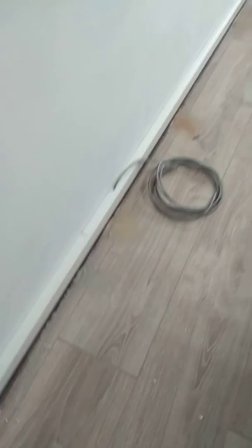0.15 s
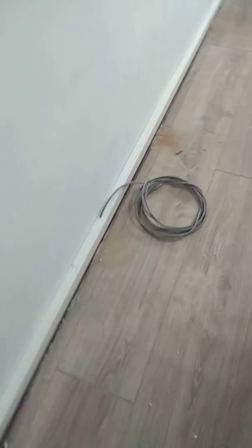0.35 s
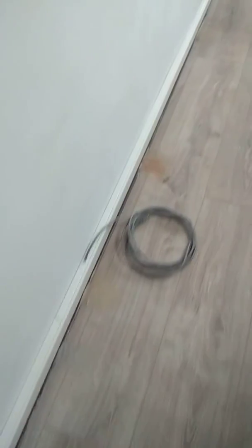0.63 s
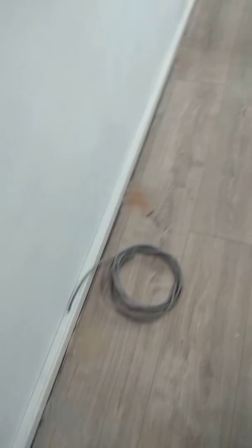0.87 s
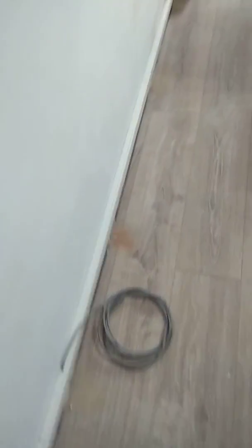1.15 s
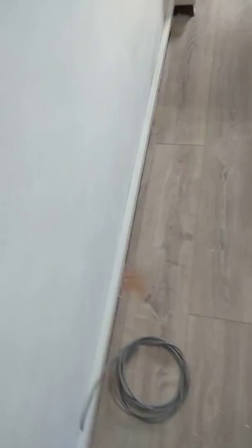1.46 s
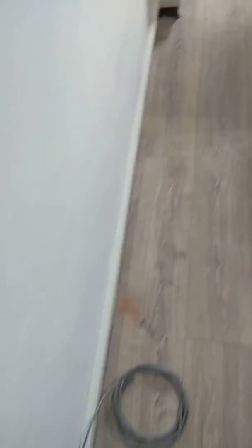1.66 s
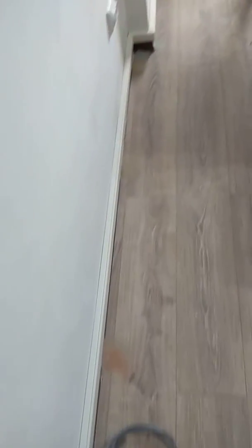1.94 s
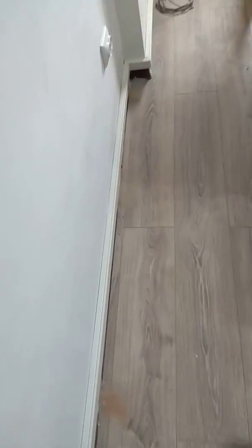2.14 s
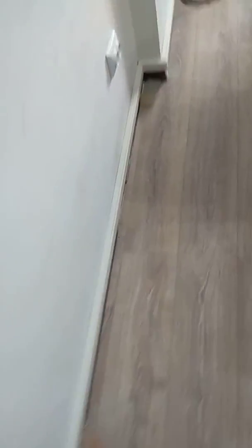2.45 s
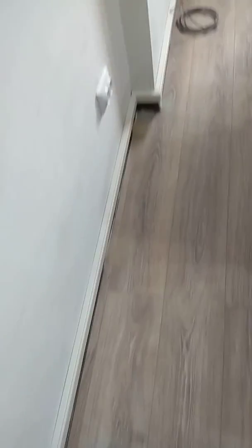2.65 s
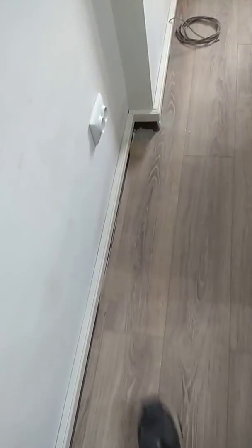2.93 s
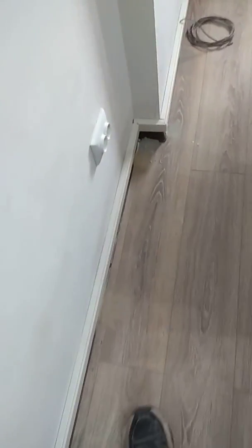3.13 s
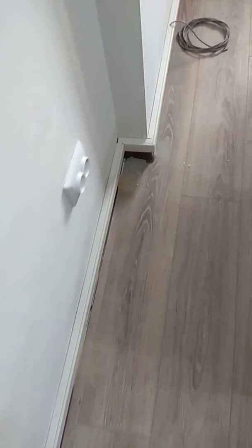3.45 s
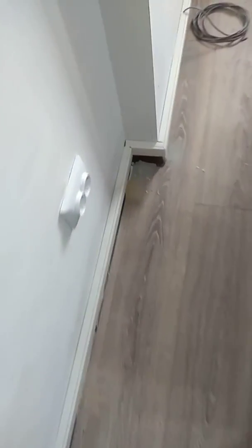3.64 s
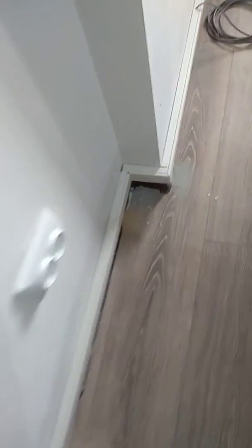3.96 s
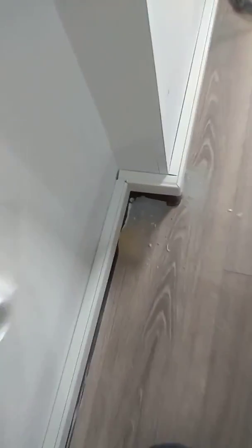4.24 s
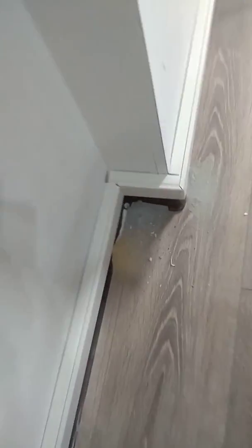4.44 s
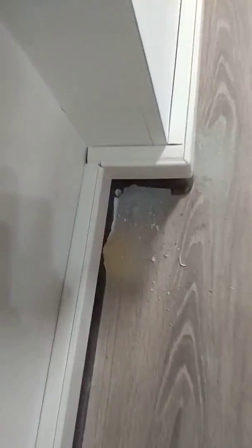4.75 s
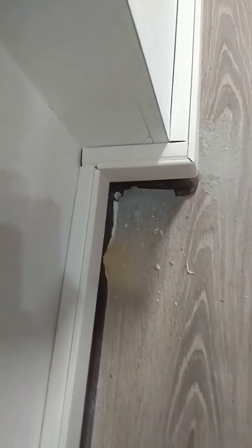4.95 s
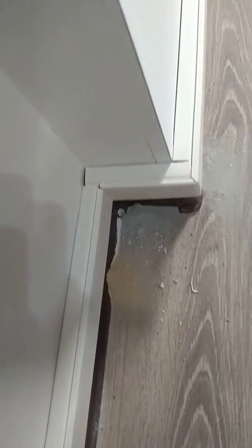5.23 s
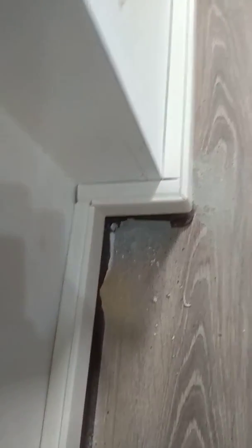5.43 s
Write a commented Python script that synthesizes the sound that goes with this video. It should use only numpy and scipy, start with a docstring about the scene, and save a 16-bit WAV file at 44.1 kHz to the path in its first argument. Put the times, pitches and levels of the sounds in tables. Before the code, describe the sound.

Slow, uneven footsteps on hollow laminate: knocks at the start, then a step about every second, ending with a tight cluster of scuff and thuds. Rubber soles rub and skid over fine grit, thin bright cracks snap from the boards, and trouser fabric hisses softly. Short bare-room reflections surround the steps, over a faint steady low rumble. Heard in stereo from a phone carried in the walker's hand, bright and close, without speech.

```python
"""Slow steps on laminate

Trainers cross a floating laminate floor in a bare office, heard from a phone with two ports in the walker's hand.
Each heel knocks the boards: a push sets plank modes sounding, and a boom and rings build up behind it.
The sole scuffs and rolls over fine grit: noise and random grains, filtered and swelling with the steps.
Plank joints tick as short ringing cracks; trouser cloth swishes as filtered hiss, over a low room rumble.
"""
import sys
import numpy as np
from scipy import signal
from scipy.fft import rfft, irfft, next_fast_len
from scipy.io import wavfile
from scipy.ndimage import uniform_filter1d

SR = 44100
rng = np.random.default_rng(int(sys.argv[2]) if len(sys.argv) > 2 else 0)


def wav_out(sig):
    """Save sig, one row per channel (or a flat mono array), as 16-bit PCM at SR to the path in sys.argv[1]."""
    wavfile.write(sys.argv[1], SR, np.round(np.clip(np.atleast_2d(sig).T, -1, 1) * 32767).astype(np.int16))


N = 246632
TOP_HZ = 16000
PORT_LAG_S = 0.000281


def undb(db):
    """Decibels to gain."""
    return 10 ** (np.asarray(db) / 20)


def unit(x):
    """Scale to rms 1."""
    return x / np.sqrt(np.mean(x ** 2))


def seconds(length):
    """Time axis of the given length."""
    return np.arange(int(length * SR)) / SR


def fade(t, t60):
    """Exponential decay, 60 dB down at t60."""
    return np.exp(-np.log(1000) * t / t60)


def add(out, x, s):
    """Mix x into out from time s on."""
    i = max(int(s * SR), 0)
    out[..., i:i + x.shape[-1]] += x[..., :max(N - i, 0)]


def colour(x, points, tilt_db=0):
    """Filter by (Hz, dB) points plus a tilt per octave that is zero at the last point."""
    hz, db = np.transpose(points)
    size = next_fast_len(x.shape[-1] + 512)
    octave = np.log2(np.maximum(np.fft.rfftfreq(size, 1 / SR), hz[0]))
    gain_db = np.interp(octave, np.log2(hz), db) + tilt_db * (octave - np.log2(hz[-1]))
    return irfft(rfft(x, size) * undb(gain_db), size)[..., :x.shape[-1]]


def walk(rate, size):
    """Smooth random wander with a spread near 1."""
    hold = int(SR / rate)
    steps = np.repeat(rng.standard_normal(size // hold + 2), hold)
    return 1.2 * uniform_filter1d(steps, hold)[:size]


def modes(t, table, base_hz=1):
    """Sum of fading sines from (Hz or multiple of base_hz, dB, t60) rows."""
    return sum(undb(db) * np.sin(2 * np.pi * base_hz * k * t) * fade(t, t60) for k, db, t60 in table)


def from_below(x):
    """Sound from the floor reaches the left port first."""
    sample = np.arange(len(x))
    late = np.interp(sample - PORT_LAG_S * SR, sample, x, left=0)
    return np.array([x, late])


def diffuse(size, alike_hz=1000):
    """Noise from all sides: nearly the same at both ports in the bass, unrelated in the treble."""
    padded = 2 * next_fast_len(size // 2 + 1)
    mid, side = rfft(rng.standard_normal((2, padded)))
    alike = np.clip(0.91 * np.sinc(np.linspace(0, SR / 2, len(mid)) / alike_hz), -1, 1)
    mid, side = mid * np.sqrt(1 + alike), side * np.sqrt(1 - alike)
    return unit(irfft(np.array([mid + side, mid - side]))[:, :size])


def room(x, t60, gap_s, early_db, early_t60):
    """Echoes of the near wall, then the tail of the bare room; drawn anew for every sound."""
    t = seconds(.7)
    decay = fade(t, t60) + undb(early_db) * fade(t, early_t60)
    echoes = diffuse(len(t)) * decay * (t > gap_s)
    return signal.fftconvolve(x[None], echoes / np.sqrt(np.sum(echoes ** 2) / 2), axes=1)


def friction(size, grain_db, flicker_db):
    """Dense tiny slips: a diffuse hiss with grains of uneven size, coming in fits."""
    sizes = undb(4 * np.minimum(rng.exponential(size=size), 3.5))
    struck = rng.random(size) < 1500 / SR  # about 1500 grains per second
    grains = unit(sizes * rng.choice([-1, 1], size) * struck)
    hiss = diffuse(size) + undb(grain_db) * from_below(grains)
    return hiss * undb(flicker_db * walk(110, size))


def ripple(x, ring_db, ring_t60=0.05):
    """Ripple the spectrum above about 1 kHz with a short, randomly drawn ring."""
    t = seconds(.03)
    direct = (t == 0).astype(float)
    ring = rng.standard_normal(len(t)) * fade(t, ring_t60)
    response = direct + undb(ring_db) * ring / np.sqrt(np.sum(ring ** 2))
    response /= np.sqrt(np.sum(response ** 2))
    # mainly the treble departs from the direct sound
    treble = signal.butter(1, 1200, "high", fs=SR, output="sos")
    response = direct + signal.sosfilt(treble, response - direct)
    return signal.fftconvolve(x, response[None], axes=1)[:, :x.shape[1]]


# spectrum of cracking dust: (frequency_hz, density_db)
GRIT_COLOUR = [(500, -16), (1800, -12), (3200, -1), (4300, -40), (5800, -1), (8000, -3.5), (11000, 13),
               (16000, 10.5)]


def grit(size, per_s):
    """Lone grains of dust crack: randomly timed noise bursts of uneven size, fading within milliseconds."""
    sizes = undb(5 * np.minimum(rng.exponential(size=size), 2))
    cracks = sizes * (rng.random(size) < per_s / SR)
    envelope = signal.fftconvolve(cracks, fade(seconds(.008), 0.006))[:size]
    bursts = envelope * rng.standard_normal(size)
    return from_below(unit(colour(bursts, GRIT_COLOUR)))


# spectrum of the office rumble: (frequency_hz, density_db)
RUMBLE_COLOUR = [(20, -49), (50, -21), (85, -20.5), (120, -1.5), (160, 4), (240, 0), (400, -10),
                 (650, -15.5), (1050, -16.5), (1500, -32), (4000, -92), (16000, -26)]
# faint low hums in the room: (start_s, end_s, centre_pitch_hz, level_db)
HUMS = [(1.758, 1.96, 214, -55), (3.0, 3.82, 168.8, -58.5), (3.892, 4.204, 104.8, -66)]


def building(rumble_db=-59.5, wander_db=0.84):
    """Low room rumble, wandering slightly in level, in which unsteady faint hums swell and fade."""
    level_db = rumble_db + wander_db * walk(7.4, N)
    out = undb(level_db) * unit(colour(diffuse(N), RUMBLE_COLOUR))
    for start, end, hz, db in HUMS:
        size = int((end - start) * SR)
        phase = 2 * np.pi * np.cumsum(hz * (1 + 0.041 * walk(9.2, size))) / SR
        hum = np.sqrt(2) * np.sin(phase) * signal.windows.tukey(size, .6)
        add(out, undb(db) * hum, start)
    return out


# the sole rolls under the weight and the trouser leg settles; rub is before rustle's overall trim:
# (full_load_s, rub_level_db, swish_level_db, release_t60_s)
ROLLS = [(0.0, -45.5, -47, 0.68), (0.55, -54.5, -48.5, 1.07), (1.492, -52.5, -48.5, 0.91),
         (1.74, -53.5, -57, 0.88), (2.335, -50, -60, 1), (3.15, -50.5, -54, 0.71),
         (3.823, -50, -45.5, 0.92), (4.35, -53, -47.5, 0.72)]
# a leg swings through; rub is before the same trim: (mid_swing_s, rub_level_db, swish_level_db, half_length_s)
SWINGS = [(0.28, -63.5, -59.5, 0.1), (1.08, -62, -61, 0.12), (2.164, -59, -56.5, 0.11),
          (3.568, -60, -61, 0.072), (4.23, -51.5, -50.5, 0.19), (4.688, -62, -52.5, 0.16),
          (5.476, -87, -66.5, 0.17)]


def effort(rise_t60_s=0.82, hold_s=0.026, stir_rub_db=-76.5, stir_swish_db=-62.5, stop_s=5.042, stop_t60_s=0.63):
    """Gains of rub and swish: rolls build, hold and release, swings swell and ebb, over a faint stir."""
    t = np.arange(N) / SR
    walking = fade(np.maximum(t - stop_s, 0), stop_t60_s)
    power = (undb([[stir_rub_db], [stir_swish_db]]) * walking) ** 2
    for s, rub_db, swish_db, t60 in ROLLS:
        build = fade(np.maximum(s - t, 0), rise_t60_s)
        release = fade(np.maximum(t - s - hold_s, 0), t60)
        power += (undb([[rub_db], [swish_db]]) * build * release) ** 2
    for s, rub_db, swish_db, half_s in SWINGS:
        speed = np.exp(-.5 * ((t - s) / half_s) ** 2)
        power += (undb([[rub_db], [swish_db]]) * speed) ** 2
    return np.sqrt(power)


def changing_ripple(x, ring_db, stretch_s):
    """Overlapping stretches of the hiss, each with its own random spectral ripple, crossfade smoothly."""
    out, size = np.zeros((2, N)), int(stretch_s * SR)
    half = size // 2
    padded = np.pad(x, [(0, 0), (half, size)])
    for i in range(0, N + half, half):
        stretch = ripple(padded[:, i:i + size], ring_db) * signal.windows.cosine(size)
        # the first stretch starts halfway through
        add(out, stretch[:, max(half - i, 0):], (i - half) / SR)
    return out


# spectrum of passing trouser cloth: (frequency_hz, density_db)
SWISH_COLOUR = [(500, -19), (2000, -16), (5000, -13.5), (7500, -8.5), (10300, 2.5), (13000, 2), (16000, -3)]
# spectrum of the sole rubbing the boards: (frequency_hz, density_db)
RUB_COLOUR = [(120, 7), (350, 17), (800, 11), (1300, 12), (2200, 11), (3200, 11.5), (5500, 8), (8000, 4.5),
              (11000, 0), (16000, -28)]


def rustle(rub_db=-1, grit_db=-5, crackle_db=-10):
    """Trouser legs swish and faintly crackle as they pass; the loaded sole adds a coarser, gritty rub."""
    rub_level, swish_level = effort()
    cloth = changing_ripple(friction(N, grain_db=-19, flicker_db=1.6), ring_db=-5, stretch_s=.12)
    swish = unit(colour(cloth, SWISH_COLOUR)) + undb(crackle_db) * grit(N, per_s=35)
    sole = changing_ripple(friction(N, grain_db=-12, flicker_db=1.4), ring_db=7, stretch_s=.16)
    rub = unit(colour(sole, RUB_COLOUR)) + undb(grit_db) * grit(N, per_s=170)
    return swish_level * swish + undb(rub_db) * rub_level * rub


# larger grains bursting under the sole: (start_s, peak_level_db)
GRAINS = [(0.414, -25), (0.436, -36), (0.549, -27), (0.662, -26), (0.669, -27), (1.056, -34), (1.120, -34),
          (1.325, -31), (1.412, -24), (1.464, -30), (2.974, -22.5), (3.040, -27), (3.842, -24),
          (4.2195, -21), (5.347, -44), (5.499, -41)]


def crunches(shade_db=-4, room_db=-8):
    """Now and then a larger grain bursts under the sole with a tiny sharp crack, weaker at the right port."""
    out, t = np.zeros((2, N)), seconds(.02)
    for s, db in GRAINS:
        crack = colour(rng.choice([-1, 1], len(t)) * fade(t, 0.005), GRIT_COLOUR)
        crack *= undb(db) / np.abs(crack).max()
        echoes = room(crack, t60=0.7, gap_s=0.002, early_db=7, early_t60=0.2)
        add(out, from_below(crack) * undb([[0], [shade_db]]), s)
        add(out, undb(room_db) * echoes, s)
    return out


# spectrum of plank joint cracks: (frequency_hz, gain_db)
TICK_COLOUR = [(800, 6), (2200, 12.3), (4000, 0.5), (7000, 1.04), (11000, 6.2), (16000, 5)]
# plank joints ticking; the ring fades in half the crack's time:
# (start_s, level_db, ring_pitch_hz, ring_level_db, crack_t60_s, crack_low_hz, crack_high_hz, room_level_db)
TICKS = [(.0878, -28, 5640, -11, 0.008, 4800, 15000, -10),
         (0.4994, -22.5, 9100, -13, 0.0024, 6030, 14900, -0.5),
         (1.8573, -30, 3340, -1.5, 0.0045, 2900, 12800, -2.5),
         (2.076, -35.5, 5900, -5, 0.0039, 4400, 15100, -4),
         (2.262, -20.5, 5800, 0.5, 0.0083, 5400, 12000, -2.5),
         (2.262, -30, 3200, -11, 0.0069, 2420, 3650, -7), (2.486, -25, 8400, -4, 0.0034, 5660, 14900, -2.5),
         (3.0593, -24, 7600, -2.5, 0.0031, 5500, 15000, 3.5),
         (3.1358, -19.5, 4800, -26, 0.0031, 4570, 12800, 2),
         (3.6078, -30.5, 4700, 2.5, 0.0041, 3500, 13900, -6.5),
         (3.813, -32, 7100, -9, 0.0032, 5200, 15000, 6), (4.336, -28.5, 7600, -7, 0.0039, 5000, 15000, -14),
         (4.4416, -25, 9700, 0, 0.0026, 7000, 15500, -15),
         (4.499, -22, 7800, -14, 0.014, 6270, 12900, -12.5),
         (4.579, -35.5, 12100, 1, 0.006, 8500, 15500, -13),
         (4.7617, -31, 5500, -5.5, 0.0084, 5000, 13400, -11),
         (4.809, -30.5, 8450, -16, 0.006, 5730, 15000, -18.5),
         (5.5611, -36, 2650, -11.5, 0.015, 5860, 14100, -8.5)]


def ticks(crack_db=-3, shade_db=-5):
    """A joint slips under the weight: a crack that rings for a few milliseconds and wakes the room."""
    out, t = np.zeros((2, N)), seconds(.03)
    for s, db, hz, ring_db, t60, low_hz, high_hz, room_db in TICKS:
        snap = modes(t, [(hz, ring_db, t60 / 2)])
        crack = undb(crack_db) * rng.choice([-1, 1], len(t)) * fade(t, t60)
        band = signal.butter(3, [low_hz, high_hz], "band", fs=SR, output="sos")
        tick = undb(db) * (snap + colour(signal.sosfilt(band, crack), TICK_COLOUR))
        echoes = room(tick, t60=0.53, gap_s=0.00126, early_db=7, early_t60=0.32)
        add(out, from_below(tick) * undb([[0], [shade_db]]), s)
        add(out, undb(room_db) * echoes, s)
    return out


# spectrum of rubber skidding on laminate: (frequency_hz, density_db)
SCUFF_COLOUR = [(200, -30), (700, 10), (1500, 5.5), (2400, 0.5), (3400, 4), (4700, 4), (5900, 3.5),
                (7500, 1), (10000, 8.5), (13000, 4.5), (15000, -1), (16000, -29)]
# sole scuffs: (start_s, level_db, rise_s, release_t60_s, brightness_db_per_octave)
SCUFFS = [(0.015, -39, 0.024, 0.068, 14), (0.333, -35, 0.0012, 0.41, 3.5), (0.427, -44.5, 0.006, 0.23, 3.5),
          (0.499, -44, 0.002, 0.04, 6), (0.654, -53, 0.019, 0.25, -3.5), (1.118, -53.5, 0.0062, 0.3, 2.5),
          (1.322, -44, 0.002, 0.13, 5.5), (1.345, -45, 0.092, 0.64, -0.5), (1.41, -34, 0.00084, 0.055, 3.5),
          (1.429, -35.5, 0.0033, 0.069, 1.5), (1.558, -41, 0.018, 0.077, 9),
          (1.672, -32.5, 0.0018, 0.11, 9), (1.679, -37.5, 0.0016, 0.23, 4),
          (2.19, -41.5, 0.0048, 0.59, 1.5), (2.29, -41.5, 0.076, 0.33, 3), (2.484, -45, 0.0025, 0.22, 3.5),
          (2.97, -44, 0.0027, 0.46, 2.5), (3.081, -38, 0.004, 0.2, 6), (3.134, -44.5, 0.0013, 1, 2.5),
          (3.697, -35, 0.0073, 0.19, 9.5), (3.9, -40, 0.011, 0.12, 4), (4.218, -31.5, 0.006, 0.26, 3.5),
          (4.29, -49, 0.016, 0.31, 0.5), (4.346, -32.5, 0.0021, 0.045, 16)]


def scuffs():
    """The sole skids briefly as it lands or pushes off, catching unevenly and crunching dust."""
    out, t = np.zeros((2, N)), seconds(.4)
    for s, db, rise, t60, tilt_db in SCUFFS:
        skid = np.minimum(t / rise, 1) ** 0.2 * fade(np.maximum(t - rise, 0), t60)
        slips = ripple(friction(len(t), grain_db=-4, flicker_db=1.6), ring_db=6)
        catching = unit(undb(1.8 * walk(160, len(t))))
        scrape = unit(colour(slips, SCUFF_COLOUR)) * catching + undb(-2) * grit(len(t), per_s=240)
        scrape = skid * colour(scrape, [(200, 0), (TOP_HZ, 0)], tilt_db)
        add(out, undb(db) * unit(scrape) * np.sqrt(np.mean(skid ** 2)), s)
    return out


# planks on their underlay: (pitch_hz, level_db, t60_s)
PLANK_MODES = [(182, -2.5, 0.012), (290, 3.5, 0.0029), (375, -32.5, 0.25), (724, -10, 0.0155),
               (805, -29, 0.061), (904, -26, 0.072), (1500, -3.5, 0.009)]
# boom of the floating floor: (multiple_of_boom_pitch, level_db, t60_s)
BOOM_MODES = [(1.002, -3, 0.37), (1.17, -2, 0.19), (1.6, -10, 0.51)]
# planks ringing on: (multiple_of_ring_pitch, level_db, t60_s)
RING_MODES = [(0.999, 5, 0.15), (1.086, -8, 0.17)]
# spectrum of a flat sole slapping: (frequency_hz, density_db)
SLAP_COLOUR = [(300, -20), (900, 8), (1250, 3), (1550, 5), (2100, -6), (2800, -14), (6000, -35),
               (16000, -48)]
# repeats of each blow, level relative to it: (lag_s, level_db)
BOUNCES = [(0.0061, -10.5), (0.0122, -17)]
# heel and forefoot blows; slap and room levels are relative to the knock:
# (start_s, level_db, contact_ms, plank_pitch_hz, plank_t60_s, boom_pitch_hz, boom_level_db,
#  low_ring_hz, low_ring_db, high_ring_hz, high_ring_db, slap_level_db, room_level_db)
KNOCKS = [(0.3338, -23.5, 0.77, 600, 0.0044, 135.9, -30.5, 540, -43.5, 799, -42, -8.5, -2.5),
          (.412, -39.5, 2.9, 200, 0.006, 137, -42.5, 445, -61, 623, -48, -25, 1),
          (1.342, -30, 1.66, 654, 0.013, 197.2, -45.5, 510, -58, 660, -58, -30, -3.5),
          (1.422, -35.5, 1.5, 734, 0.0062, 190.5, -42, 476, -57, 764, -57, -24, -7),
          (2.182, -23.5, 1.9, 633, 0.017, 139.7, -39.5, 512, -38, 666, -40, -36, 1),
          (2.9706, -29.5, 0.93, 700, 0.0057, 147.7, -37, 499, -42, 802, -49.5, -20, -0.5),
          (3.132, -35.5, 0.55, 624, 0.0046, 167.7, -41.5, 630, -64, 815, -62, -4.5, -7),
          (3.696, -39, 1.3, 645, 0.019, 163.6, -41, 560, -51, 687, -58, -36, -1),
          (4.218, -27.5, 3.1, 178, 0.0056, 149, -37, 441, -44, 745, -53, -22, -2),
          (4.266, -34, 1.5, 380, 0.0095, 156.1, -38, 395, -50, 633, -60, -5, 0.5),
          (4.3346, -24.5, 0.49, 452, 0.006, 151.2, -33, 768, -65, 940, -58, -6, -8)]


def knocks(radiate_hz=118, slap_t60=0.012, slab_hz=44, slab_db=-25, slab_t60=0.044, build_s=0.047, ring_room_db=-10):
    """A rubber heel pushes the planks: longer contact is duller, and each spot booms and rings at its own pitch."""
    out, t = np.zeros((2, N)), seconds(.6)
    highpass = signal.butter(4, radiate_hz, "high", fs=SR, output="sos")
    for (s, db, contact_ms, plank_hz, plank_t60, boom_hz, boom_db,
         low_hz, low_db, high_hz, high_db, slap_db, room_db) in KNOCKS:
        contact = contact_ms / 1000
        push = (t / contact) ** 2 * np.exp(-5 * t / contact)
        planks = modes(t, [*PLANK_MODES, (plank_hz, 0, plank_t60)])
        # the planks radiate the rate of change of their motion, and little of the longest waves
        thud = -np.gradient(signal.fftconvolve(push, planks)[:len(t)])
        thud = signal.sosfilt(highpass, thud)
        # a sole that lands flat also slaps
        slap = unit(colour(rng.standard_normal(len(t)), SLAP_COLOUR)) * fade(t, slap_t60)
        # the slab underneath answers with a faint deep thump
        slab = np.sin(2 * np.pi * slab_hz * t) * fade(t, slab_t60)
        knock = undb(db) * (thud / np.abs(thud).max() + undb(slap_db) * slap + undb(slab_db) * slab)
        # boom and rings build up as the blow spreads through the floor
        ring = undb(low_db) * modes(t, RING_MODES, low_hz) + undb(high_db) * modes(t, RING_MODES, high_hz)
        boom = undb(boom_db) * modes(t, BOOM_MODES, boom_hz)
        resonance = (ring + boom) * (1 - fade(t, build_s))
        for sound, wet_db in (knock, room_db), (resonance, ring_room_db):
            echoes = room(sound, t60=0.7, gap_s=0.0037, early_db=9, early_t60=0.038)
            # echo energy is set relative to the direct sound
            match = np.sqrt(2 * np.sum(sound ** 2) / np.sum(echoes ** 2))
            add(out, from_below(sound), s)
            add(out, undb(wet_db) * echoes * match, s)
        for lag_s, bounce_db in BOUNCES:
            add(out, undb(bounce_db) * from_below(knock), s + lag_s)
    return out


def scene():
    """The walker in the room, from the rumble behind to the heels on the boards."""
    return building() + rustle() + crunches() + ticks() + scuffs() + knocks()


# the phone's two ports; the right one faces away and is duller: (frequency_hz, left_gain_db, right_gain_db)
PORTS = [(99, -0.5, -0.5), (700, 1.5, 0), (2130, 2.5, 1), (5500, 6.5, 4.5), (8500, 7, 6), (12000, 4, -7),
         (15500, 2, -8)]


def record(dry):
    """Each port of the hand-held phone colours the sound; a steep filter cuts the top."""
    ports = np.array(PORTS)
    heard = np.array([colour(dry[c], ports[:, [0, c + 1]]) for c in range(2)])
    lowpass = signal.ellip(10, .2, 70, TOP_HZ, fs=SR, output="sos")
    return signal.sosfilt(lowpass, heard)


dry = scene()
out = record(dry)
wav_out(out)
```